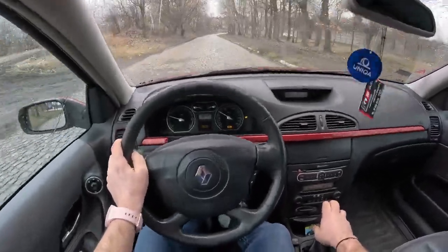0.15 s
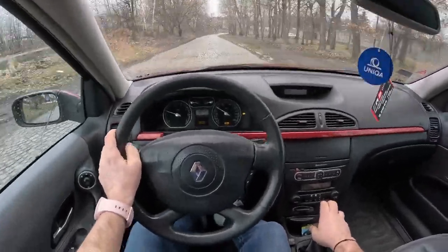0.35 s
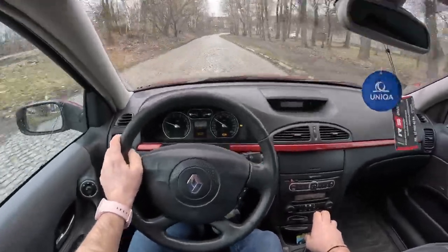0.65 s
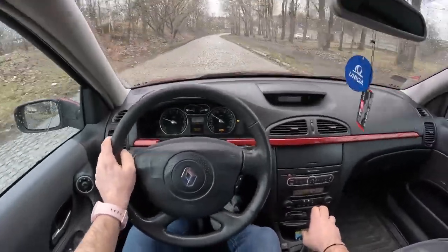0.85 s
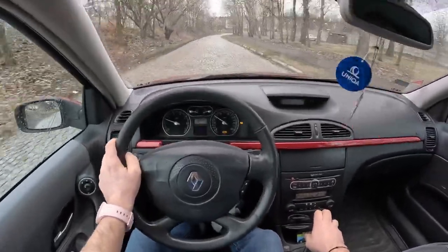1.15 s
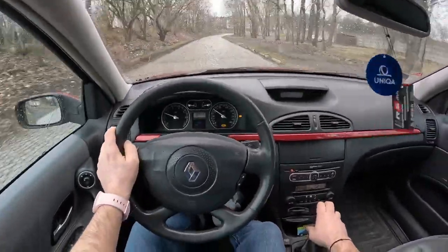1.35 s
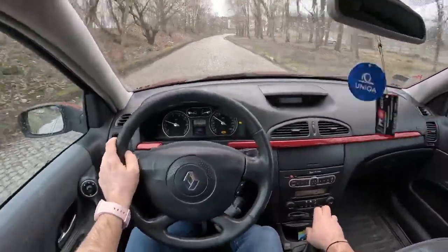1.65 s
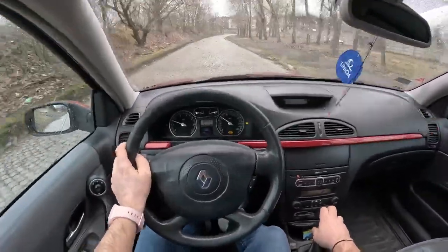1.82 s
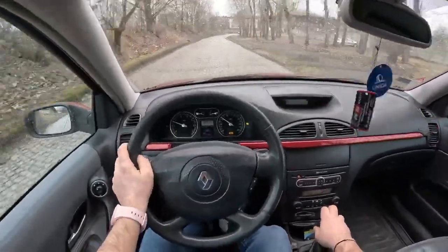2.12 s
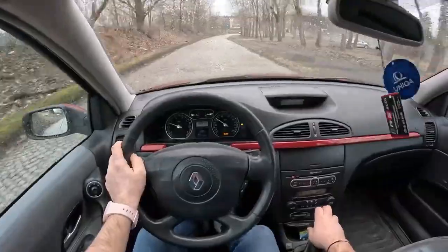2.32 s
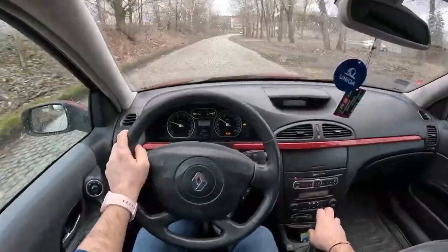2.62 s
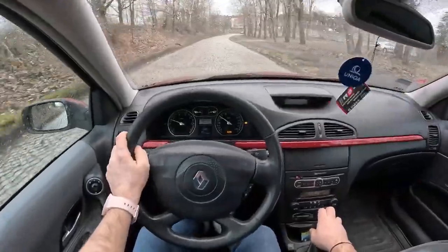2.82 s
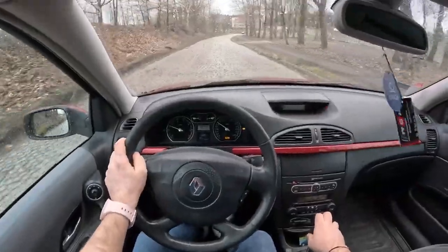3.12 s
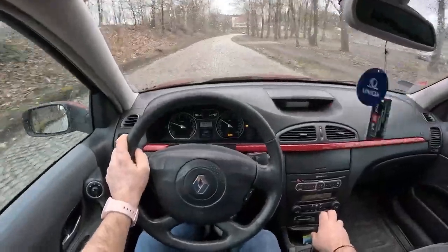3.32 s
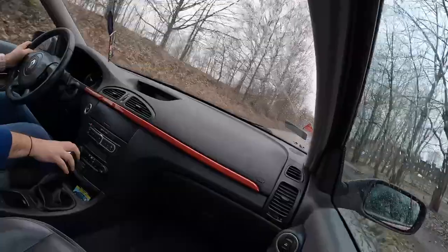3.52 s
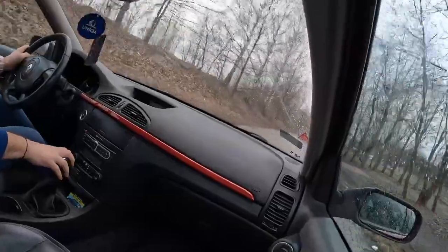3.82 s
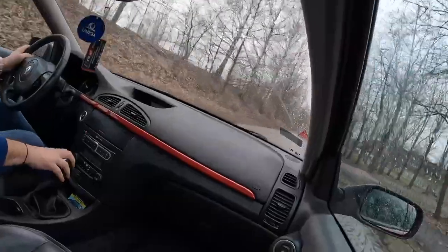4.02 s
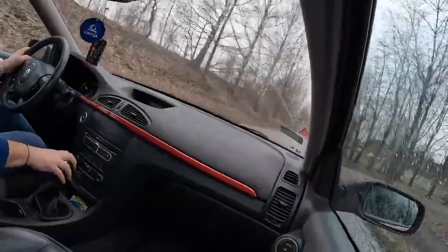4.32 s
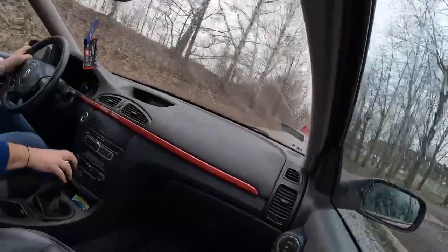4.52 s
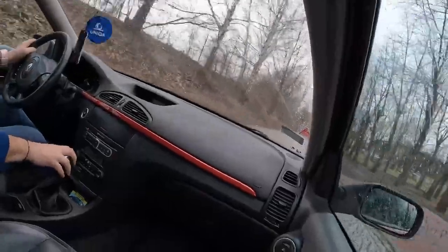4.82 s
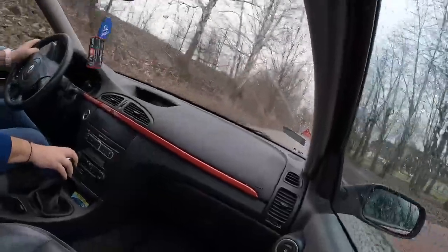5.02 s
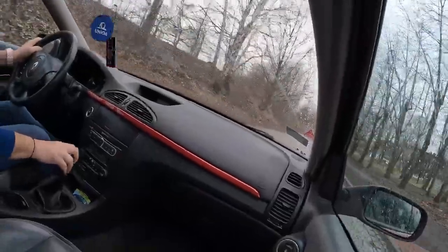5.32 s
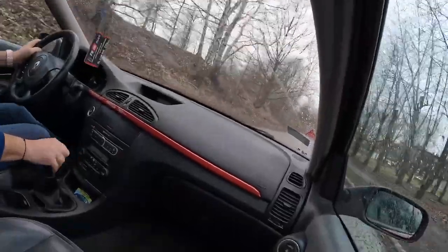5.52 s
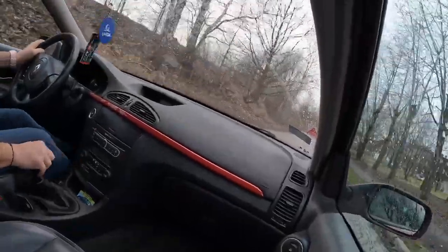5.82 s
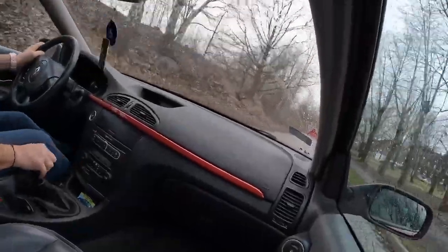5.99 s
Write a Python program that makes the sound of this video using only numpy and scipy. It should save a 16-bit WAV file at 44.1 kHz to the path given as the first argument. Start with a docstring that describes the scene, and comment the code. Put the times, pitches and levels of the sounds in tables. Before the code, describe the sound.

Inside a closed car moving at a steady pace over cobblestones for about six seconds. A deep, shuddering boom and low cabin drumming continue throughout, with a muffled, grainy tyre roar fluttering rapidly as wheels hit stones. From 0 to 0.6 s a plastic panel squeaks and rasps, strongest near 0.3, with a hard knock at 0.5. A brief lull follows, then thuds, a bright click near 1 s and a tight cluster of rattles, clicks and knocks at 1.2-1.5. Around 2.2 the panel squeaks again with a short scrape; the drumming grows heavier from 2.6. Rattling, a scrape and knocks come at 3.4-3.7, then sharp clicks and strong thuds at 4.1-4.5. Low swings and a thud follow near 4.9, a knock at 5.3, a short squeak at 5.65, and rumble to the end. Close, boxy cabin perspective, bass centred, trim noises wider.

```python
"""Car cabin on cobblestones

Inside a car rolling at a steady pace over cobblestones, windows shut. Random stone jolts drive noise
through resonances: the body booms, the cabin drums, the treads roar; big stones set the car swinging.
At listed moments plastic trim rattles, squeaks, scrapes and clicks, a loose fitting knocks and the
suspension thuds. A limiter ducks the peaks and a low-pass filter removes the top."""
import sys
import numpy as np
from scipy import signal
from scipy.fft import rfft, irfft, next_fast_len
from scipy.io import wavfile
from scipy.ndimage import uniform_filter1d, minimum_filter1d, map_coordinates

SR = 44100
rng = np.random.default_rng(int(sys.argv[2]) if len(sys.argv) > 2 else 0)


def waveform_to_disk(signal):
    """Save audio, clipped to [-1, 1], as 16-bit WAV at the path in sys.argv[1]."""
    frames = np.transpose(np.atleast_2d(signal))
    scaled = np.clip(frames, -1, 1) * 32767
    samples = np.round(scaled).astype(np.int16)
    wavfile.write(sys.argv[1], SR, samples)


N = 271215
TIME = np.arange(N) / SR  # s
PADDED = next_fast_len(N + SR // 4, True)
FREQS = np.maximum(np.arange(PADDED // 2 + 1) * SR / PADDED, 1)  # Hz

# colour of a plastic impact, for clicks and ticks: frequency_hz, density_db (per Hz, relative)
CLICK_SPECTRUM = [(700, -24.5), (2000, 5), (3500, 1), (5500, -4.5), (7500, -7), (9000, -16), (12000, -18.5),
                  (14500, -44.5)]
# colour of a hard knock, for the loose fitting and the stone patter: frequency_hz, density_db (per Hz, relative)
KNOCK_SPECTRUM = [(300, -13), (750, -5), (1060, 8), (1500, -4.5), (2300, -16), (4500, -27.5), (7000, -35.5),
                  (11000, -55.5)]
SCRAPE_Q = 10  # of the well damped resonances: scrapes and the idling panel


def from_db(db):
    """Level to amplitude: 20 dB is a factor of ten."""
    return 10 ** (np.asarray(db) / 20)


def rms_one(x):
    """Normalization to unit mean power."""
    return x / np.sqrt(np.mean(x ** 2) + 1e-20)


def steady(x, span_s):
    """Normalization by short-term power: slow swells are levelled, faster flutter stays."""
    size = max(int(span_s * SR), 2)
    power = uniform_filter1d(uniform_filter1d(x ** 2, size), size)
    return x / np.sqrt(np.abs(power) + 1e-20)


def noise():
    """Uncorrelated white noise for the direct and the scattered sound."""
    return rng.standard_normal((2, N))


def gain_in_time(rows):
    """Amplitude envelope, interpolated linearly in level."""
    seconds, level_db = np.transpose(rows)
    return from_db(np.interp(TIME, seconds, level_db))


def at_freqs(points):
    """Spectral curve, interpolated on a logarithmic frequency axis."""
    hz, value = np.transpose(points)
    return np.interp(np.log(FREQS), np.log(hz), value)


def lifted(spectrum, peaks):
    """Resonance: peaks or dips in dB stand on a broad spectrum."""
    shape = at_freqs(spectrum)
    for hz, width_hz, lift_db in peaks:
        shape = shape + lift_db / (1 + (2 * (FREQS - hz) / width_hz) ** 2)
    return shape


def causal(curve_db):
    """Minimum phase: folding the cepstrum forward lets nothing sound before its cause."""
    cepstrum = irfft(np.log(from_db(curve_db)), PADDED)
    cepstrum[1:PADDED // 2] *= 2
    cepstrum[PADDED // 2 + 1:] = 0
    return np.exp(rfft(cepstrum))


def filtered(x, response):
    """Linear filtering by multiplying spectra."""
    spare = PADDED - N
    # The sound is mirrored past its end and faded, so that no edge clicks.
    mirrored = 2 * x[..., -1:] - x[..., -2:-2 - spare:-1]
    tail = mirrored * np.exp(-20 * np.arange(spare) / spare)
    spectrum = rfft(np.concatenate([x, tail], axis=-1))
    return irfft(spectrum * response, PADDED)[..., :N]


def resonate(x, hz, width_hz):
    """Damped resonance: a two-pole band-pass, applied twice for steep skirts."""
    r = np.exp(-np.pi * width_hz / SR)
    section = [(1 - r * r) / 2, 0, (r * r - 1) / 2, 1, -2 * r * np.cos(2 * np.pi * hz / SR), r * r]
    return signal.sosfilt([section, section], x + 1e-18)


def die_away(x, t60):
    """Exponential decay: every pulse falls by 60 dB in t60 seconds."""
    return signal.lfilter([1], [1, -from_db(-60 / (t60 * SR))], x + 1e-18)


def bout(s, db, half_s):
    """Gaussian swell in amplitude that rises a little faster than it settles."""
    width_s = half_s * np.where(TIME < s, 1, 1.2)
    return from_db(db) * np.exp(-.5 * np.minimum(((TIME - s) / width_s) ** 2, 100))


def blows(rows, spectrum, t60, tail_db, tail_t60):
    """Impact: densely packed damped modes sound as decaying noise with a weak tail in the cabin."""
    pulses = np.zeros(N)
    for s, db in rows:
        pulses[int(s * SR)] += from_db(db)
    contact_s = .0012  # a blow builds up over this time
    keep = np.exp(-2 / (contact_s * SR))
    pulses = signal.lfilter([1 - keep], [1, -keep], pulses + 1e-18)
    envelope = die_away(pulses, t60) + from_db(tail_db) * die_away(pulses, tail_t60)
    colour = causal(at_freqs(spectrum))
    return filtered(envelope * noise(), colour / np.sqrt(np.mean(np.abs(colour) ** 2)))


def cobbles(unevenness=.35, spread_db=3.5):
    """Excitation: each wheel meets each stone, the rear ones a wheelbase later."""
    stones_per_s, axle_lag_s = 48, .36  # rate at the median spacing; wheelbase as a delay
    jolts = np.zeros(N)
    for track in range(2):
        draws = rng.standard_normal((700, 2))
        spacings = np.exp(unevenness * draws[:, 0])
        times = np.cumsum(spacings) / stones_per_s - 1  # starts 1 s early
        for lag in (0, axle_lag_s):
            at = ((times + lag) * SR).astype(int)
            inside = (at >= 0) & (at < N)
            jolts[at[inside]] += from_db(spread_db * draws[inside, 1])
    return jolts


def paving_roughness():
    """Surface roughness as a drive: rougher paving excites tyres and trim harder."""
    # roughness of the paving: start_s, level_db (relative)
    paving = [(0, -37.5), (.34, -36.5), (.46, -42), (.65, -42.5), (.88, -37.5), (1.2, -35), (1.31, -36.5),
              (1.41, -35.5), (1.58, -40), (2.2, -37), (2.5, -39), (2.75, -35.5), (3.28, -39), (3.72, -34.5),
              (3.92, -40), (4.27, -33.5), (4.74, -43.5), (4.89, -38), (5.2, -39), (5.58, -40), (6.15, -39)]
    return from_db(2.0) * gain_in_time(paving)


def bump_drive():
    """Power addition of the bumps that shake the trim."""
    # bumps: middle_s, level_db (relative), half_length_s
    bump_rows = [(0.257, -57.5, 0.07), (0.344, -53, .04), (0.505, -58.5, 0.059), (1.195, -51.5, 0.047),
                 (1.388, -52.5, 0.04), (1.506, -60.5, 0.022), (1.734, -60.5, 0.12), (1.942, -56, 0.03),
                 (2.177, -54.5, 0.02), (2.754, -58, 0.013), (3.4, -55.5, 0.04), (3.578, -52, 0.024),
                 (3.718, -58.5, 0.048), (4.178, -52, 0.025), (4.34, -53, 0.039), (4.479, -51.5, 0.016),
                 (4.908, -53, 0.027), (5.092, -56, 0.017), (5.587, -57.5, 0.061)]
    return np.sqrt(sum(bout(*row) ** 2 for row in bump_rows))


def faint_ticks(roar):
    """Random impacts of small parts, harder on rough paving."""
    ticks_per_s, tick_db, spread_db = 14, -61.5, 1  # mean rate; levels before the roughness acts
    draws = rng.random((160, 2))
    times = np.cumsum(2 * draws[:, 0]) / ticks_per_s
    levels = tick_db + spread_db * (2 * draws[:, 1] - 1)
    rows = [(s, db) for s, db in zip(times, levels) if s < TIME[-1]]
    return rms_one(roar) * blows(rows, CLICK_SPECTRUM, t60=0.029, tail_db=-18.5, tail_t60=0.09)


def scrapes(slips_per_s=600):
    """Friction: uneven slips of plastic on plastic excite a well damped resonance."""
    # rough scrapes: middle_s, level_db (relative), half_length_s, pitch_hz
    scrape_rows = [(.355, -56, .027, 3800), (2.192, -56.5, .028, 2600), (3.4, -54, 0.032, 3240),
                   (4.91, -60.5, 0.03, 5040), (5.092, -58.5, 0.028, 3100)]
    slips = (rng.random(N) < slips_per_s / SR) * noise()
    out = np.zeros((2, N))
    for s, db, half_s, hz in scrape_rows:
        out += bout(s, db, half_s) * steady(resonate(slips, hz, hz / SCRAPE_Q), span_s=half_s)
    return out


def panel_buzz(roar, bumps, taps_per_s=320):
    """Chatter against a seat: random taps ring a loose panel, whose pitch shifts with its pressing."""
    # squeaking bouts: middle_s, level_db (relative), half_length_s, pitch_hz
    buzzes = [(0.02, -47.5, 0.025, 1770), (0.203, -53, 0.045, 1770), (0.342, -41.5, 0.027, 1730),
              (.51, -51, 0.04, 1734), (1.786, -54, 0.02, 1770), (1.944, -51, .05, 1705),
              (2.187, -44.5, 0.031, 1726), (2.353, -54.5, .045, 1710), (2.49, -55.5, 0.025, 1670),
              (4.24, -48.5, 0.035, 1750), (4.91, -55, 0.025, 1830), (5.082, -54, 0.028, 1840),
              (5.492, -54, 0.025, 1830), (5.645, -44, 0.018, 1730), (5.83, -53, 0.025, 1750)]
    panel_hz, panel_q = 1760, 30  # resting pitch; sharpness in the bouts
    idle_db, bump_db = -30.5, -6.5  # stirring by the road and by the bumps, relative to each
    widening = 0.86  # dB of width per dB above the mean level: loud bouts turn from squeak to rasp
    taps = (rng.random(N) < taps_per_s / SR) * noise()
    stirred = np.hypot(from_db(idle_db) * roar, from_db(bump_db) * bumps)
    out = stirred * rms_one(resonate(taps, panel_hz, panel_hz / SCRAPE_Q))
    usual_db = np.mean([row[1] for row in buzzes])
    for s, db, half_s, hz in buzzes:
        width_hz = hz / panel_q * from_db(widening * max(db - usual_db, 0))
        out += bout(s, db, half_s) * steady(resonate(taps, hz, width_hz), span_s=0.02)
    return out


def trim_rattle(roar, bumps, idle_db=-30, contacts_per_s=380, ring_t60=0.1):
    """Many random plastic contacts: a stronger shake makes them denser and harder."""
    # broad colour of the rattle: frequency_hz, density_db (per Hz, relative)
    rattle = [(500, -11), (1200, 12.5), (2000, 3.5), (3100, -1), (4300, -5.5), (5500, -7), (7400, -12.5),
              (8400, -19), (10500, -20), (13000, -43), (15000, -42)]
    # resonances of the dashboard plastics: frequency_hz, width_hz, lift_db
    trim_peaks = [(2760, 200, 2), (3420, 300, 2), (3770, 300, 1.5), (5150, 400, 2.5), (6850, 500, -0.5)]
    shake = np.hypot(from_db(idle_db) * roar, bumps)
    touches = rng.random(N) < contacts_per_s * np.sqrt(rms_one(shake)) / SR
    sizes = from_db(3.5 * np.minimum(rng.exponential(1, N), 3))
    power = die_away((touches * sizes) ** 2, ring_t60 / 2)  # contacts add in power
    grains = np.sqrt(power) * noise()
    return shake * steady(filtered(grains, causal(lifted(rattle, trim_peaks))), span_s=0.26)


def chatter(jolts, share, settle_t60=0.15):
    """Amplitude modulation of unit power: each stone throws the loose parts, which then settle."""
    return np.sqrt(1 - share + share * rms_one(die_away(jolts, settle_t60)) ** 2)


def plastic_clicks(ring_db=-6, ring_t60=0.017, ring_q=7):
    """Impact and ringing: a broad crack, and the brief ring of the piece that was hit."""
    # sharp clicks: start_s, level_db (relative), pitch_hz
    clicks = [(0.038, -41, 6400), (0.154, -48, 6000), (.252, -47, 5000), (.338, -56, 4000),
              (.381, -53, 3800), (.766, -51, 3500), (0.96, -39.5, 3740), (1.131, -47, 3000),
              (1.255, -53, 3800), (1.37, -44, 3700), (1.406, -48, 6400), (1.411, -39, 4000),
              (1.422, -46, 2900), (1.44, -40, 3600), (1.695, -49.5, 5570), (2.291, -47.5, 6500),
              (2.594, -49.5, 7800), (3.034, -58, 3000), (3.186, -48.5, 4400), (3.511, -39.5, 4100),
              (3.519, -41, 8200), (3.672, -45.5, 5200), (3.692, -50, 6000), (3.718, -43, 6840),
              (4.065, -49, 5000), (4.134, -42, 6460), (4.177, -36.5, 6200), (4.184, -44.5, 4400),
              (4.288, -42, 5950), (4.302, -42, 5500), (4.455, -47, 6500), (4.479, -55, 3500),
              (4.628, -50, 3980), (4.846, -46, 3350), (5.18, -51, 3800), (5.261, -47, 3700),
              (5.479, -49, 5000), (5.52, -49, 4200), (5.814, -47.5, 5480), (5.943, -47, 6000)]
    cracks = [row[:2] for row in clicks]
    out = from_db(-4.5) * blows(cracks, CLICK_SPECTRUM, t60=0.039, tail_db=-12, tail_t60=0.13)
    age = TIME[:SR // 20]
    for s, db, hz in clicks:
        ring = rms_one(resonate(rng.standard_normal((2, len(age))), hz, hz / ring_q))
        start = int(s * SR)
        out[:, start:start + len(age)] += from_db(db + ring_db - 60 * age / ring_t60) * ring
    return out


def fitting_knocks():
    """Impacts of a loose fitting: short, hard and quickly damped."""
    # knocks: start_s, level_db (relative)
    knocks = [(.51, -29), (.576, -32), (1.256, -31), (1.372, -31), (1.413, -31), (2.003, -33.5),
              (3.036, -38), (3.454, -33), (3.594, -32), (3.725, -34), (4.07, -34.5), (4.169, -31),
              (4.58, -33.5), (4.794, -33), (5.26, -29.5), (5.581, -32)]
    return from_db(-5.5) * blows(knocks, KNOCK_SPECTRUM, t60=0.039, tail_db=-19.0, tail_t60=0.046)


def suspension_thuds():
    """Low impacts of the suspension on proud stones, with a weak long tail."""
    # thuds: start_s, level_db (relative)
    thuds = [(.755, -30.5), (.93, -31.5), (1.172, -26.5), (1.35, -31.5), (1.675, -28), (1.916, -28),
             (2.653, -27.5), (2.755, -29.5), (3.15, -34.5), (3.411, -28), (3.71, -28.5), (4.114, -27),
             (4.275, -25.5), (4.452, -28.5), (4.865, -26), (5.665, -30)]
    # colour of a thud: frequency_hz, density_db (per Hz, relative)
    thud_spectrum = [(90, -10), (200, -1), (290, 5.5), (500, -5), (900, -18), (1800, -35), (5000, -59.5)]
    return from_db(-3.0) * blows(thuds, thud_spectrum, t60=0.11, tail_db=-20.5, tail_t60=0.62)


def patter(jolts, tap_t60=0.087):
    """Structure-borne sound: stones tap through wheel bearings and struts as small dry knocks."""
    taps = steady(die_away(jolts, tap_t60), span_s=0.14)
    return rms_one(filtered(taps * noise(), causal(at_freqs(KNOCK_SPECTRUM))))


def tyres(jolts, slap_t60=0.097, rolling=1.2):
    """Tread noise: a short noise burst for each stone, added in power to an even rolling hiss."""
    # broad colour of the roar: frequency_hz, density_db (per Hz, relative)
    roar_spectrum = [(120, -16), (200, 0), (290, 0), (400, -8.5), (550, -11.5), (780, -18), (1200, -20.5),
                     (1550, -27), (2100, -35), (3500, -40), (7000, -51.5), (12000, -69.5)]
    # resonances of tyres and wheel wells: frequency_hz, width_hz, lift_db
    tyre_peaks = [(424.8, 30, 7), (396, 20, -7.5), (944, 83, 7), (1022, 61, 4.5)]
    slaps = np.sqrt(rolling ** 2 + rms_one(die_away(jolts, slap_t60)) ** 2)
    return steady(filtered(slaps * noise(), causal(lifted(roar_spectrum, tyre_peaks))), span_s=0.074)


def road_noise(jolts, roar, bumps):
    """Tyre roar and stone patter share one excitation; bumps swell both."""
    bump_db, patter_db = 5.5, -19.5  # relative to the bump drive; relative to the tyre roar
    level = np.hypot(roar, from_db(bump_db) * bumps)
    return level * (tyres(jolts) + from_db(patter_db) * patter(jolts))


def heave(depth_db):
    """Slow random modulation: the load wanders smoothly as the car rocks on its springs."""
    knots_per_s = 6
    knots = rng.standard_normal(200)
    wander = map_coordinates(knots, [TIME * knots_per_s], order=3, mode="mirror")
    return from_db(depth_db * wander)


def rumble(jolts, modes):
    """Modal excitation: every jolt pushes each mode with a strength and sign of its own."""
    total = np.zeros((2, N))
    for hz, width_hz, db in modes:
        total += from_db(db) * resonate(jolts * noise(), hz, width_hz)
    return steady(total, span_s=0.077)


def cabin_drumming(jolts):
    """Low cabin resonances, driven by the stones."""
    # cabin modes: frequency_hz, width_hz, level_db (relative)
    cabin_modes = [(87.2, 25.8, -2.6), (115.4, 25.6, 0.5), (135.4, 24, 0.5), (158.1, 29, -9.5),
                   (188.05, 20.3, -6), (232.8, 52, -18.5)]
    # course of the drumming: start_s, level_db (relative)
    drumming = [(0, -25), (.65, -25.5), (1.2, -22.5), (1.5, -27), (1.62, -22.5), (2.1, -21), (2.4, -24.5),
                (2.65, -18.5), (3.3, -21.5), (3.8, -22.5), (4.0, -21.5), (4.2, -20), (4.46, -20.5),
                (4.56, -30.5), (4.66, -26), (4.87, -19.5), (5.08, -22), (6.15, -21.5)]
    return from_db(0.5) * gain_in_time(drumming) * heave(depth_db=1.0) * rumble(jolts, cabin_modes)


def body_boom(jolts):
    """The lowest resonances of the car body, driven by the stones."""
    # body modes: frequency_hz, width_hz, level_db (relative)
    body_modes = [(13.2, 12.5, 3), (30.76, 27.5, 2.5), (46.9, 11, -7.5)]
    # course of the boom: start_s, level_db (relative)
    boom = [(0, -19), (1.3, -17.5), (1.7, -19.5), (3.1, -17.5), (6.15, -21)]
    return from_db(2.5) * gain_in_time(boom) * heave(depth_db=1.5) * rumble(jolts, body_modes)


def wallops(sharpness=3.0):
    """Transient resonance: a big stone or hollow swells one low mode, which dies away more slowly."""
    # swings of the car: crest_s, level_db (relative), pitch_hz, rise_s
    swings = [(0.111, -16, 121, 0.052), (0.309, -10.5, 32, .05), (.39, -24.5, 186, 0.037),
              (0.521, -15.5, 84.7, 0.022), (1.03, -20, 86, .04), (1.109, -14, 27.8, 0.16),
              (1.191, -28.5, 311, 0.04), (1.19, -22, 184, 0.024), (1.33, -15.5, 36.7, 0.11),
              (1.359, -22, 78, 0.028), (1.478, -11, 34, 0.06), (1.741, -21, 82.6, 0.058),
              (1.8, -19, 116, 0.032), (2.013, -24, 194.6, 0.043), (2.579, -20.5, 121, 0.046),
              (2.718, -20, 88.7, .08), (2.838, -13.5, 30.8, 0.058), (2.981, -22.5, 191.6, 0.047),
              (2.991, -18.5, 135.3, 0.048), (3.161, -11.5, 29.7, 0.061), (3.441, -21, 134, 0.023),
              (3.48, -16, 43.2, 0.03), (3.72, -20, 174.7, .04), (4.06, -22, 79.8, 0.06),
              (4.07, -25.5, 182, 0.046), (4.099, -17.5, 118.7, 0.05), (4.412, -11.5, 28.8, 0.042),
              (4.721, -14.5, 122.5, 0.026), (4.83, -17, 89.7, 0.062), (4.87, -15.5, 123.7, 0.053),
              (5.23, -16.5, 118.9, 0.064), (5.4, -16.5, 84.5, 0.031), (5.52, -17, 31, 0.077),
              (5.79, -20.5, 119.5, 0.064), (5.951, -10, 31.8, 0.05), (6.042, -13, 80, 0.023)]
    out = np.zeros(N)
    phases = rng.uniform(0, 2 * np.pi, len(swings))
    for (s, db, hz, rise_s), phase in zip(swings, phases):
        span = slice(max(int((s - rise_s) * SR), 0), int((s + 5 * rise_s) * SR))
        age = TIME[span] - s
        swell = np.maximum(1 + age / rise_s, 0)
        envelope = (swell * np.exp(1 - swell)) ** sharpness  # 1 at the crest
        out[span] += from_db(db) * envelope * np.sin(2 * np.pi * hz * age + phase)
    return from_db(1.0) * np.array([out, np.zeros(N)])  # direct sound only


def in_cabin(x):
    """Mid and side: direct sound is common to both ears; glass and trim scatter the rest apart."""
    # stereo width: frequency_hz, diffuse_over_direct_db
    width_curve = [(30, -40), (130, -34), (200, -24), (330, -15), (700, -10.5), (1000, -12), (2300, -5.5),
                   (5000, -6.5), (12000, -9)]
    # stereo balance: frequency_hz, left_over_right_db
    lean_curve = [(110, 0), (250, .6), (550, 1.4), (1050, 3.3), (2200, .8), (10000, .9)]
    side = filtered(x[1], from_db(at_freqs(width_curve)))
    lean = from_db(at_freqs(lean_curve) / 2)
    return filtered(np.array([x[0] + side, x[0] - side]), np.array([lean, 1 / lean]))


def scene():
    """Superposition: road noise through the body, with the trim answering the bumps."""
    roar = paving_roughness()
    bumps = bump_drive()
    jolts = cobbles()
    rubbing = panel_buzz(roar, bumps) + scrapes()
    loose = from_db(3.0) * trim_rattle(roar, bumps) + from_db(-5.5) * rubbing
    trim = chatter(jolts, share=0.19) * loose + from_db(-2.5) * plastic_clicks()
    impacts = faint_ticks(roar) + fitting_knocks() + suspension_thuds()
    road = road_noise(jolts, roar, bumps)
    low = cabin_drumming(jolts) + body_boom(jolts) + wallops()
    return in_cabin(trim + impacts + road + low)


def record(dry):
    """Dynamic compression: a soft-knee limiter ducks around each peak; a low-pass cuts the top."""
    ceiling_db, hold_s, cutoff_hz = -6.5, 0.0098, 15500
    size = max(int(hold_s * SR), 2)
    over = np.abs(dry).max(axis=0) / from_db(ceiling_db)
    gain = (1 + over ** 6) ** (-1 / 6)
    gain = uniform_filter1d(minimum_filter1d(gain, 2 * size), size)  # hold the dip, then smooth it
    low_pass = signal.cheby2(12, 70, cutoff_hz, fs=SR, output="sos")
    return signal.sosfilt(low_pass, dry * gain)


dry = scene()
out = record(dry)
waveform_to_disk(out)
```